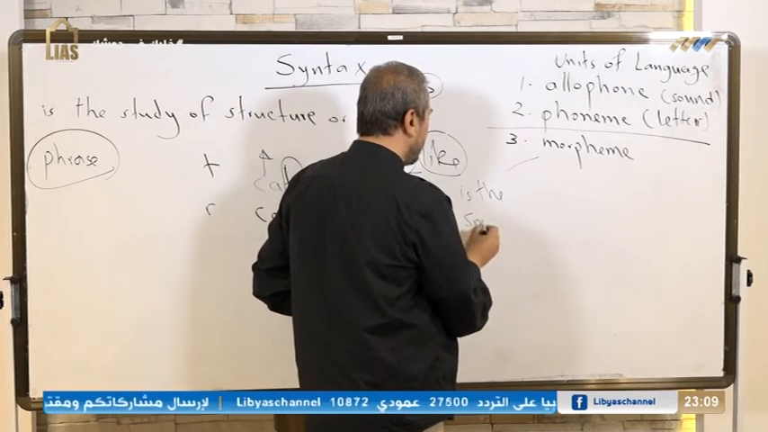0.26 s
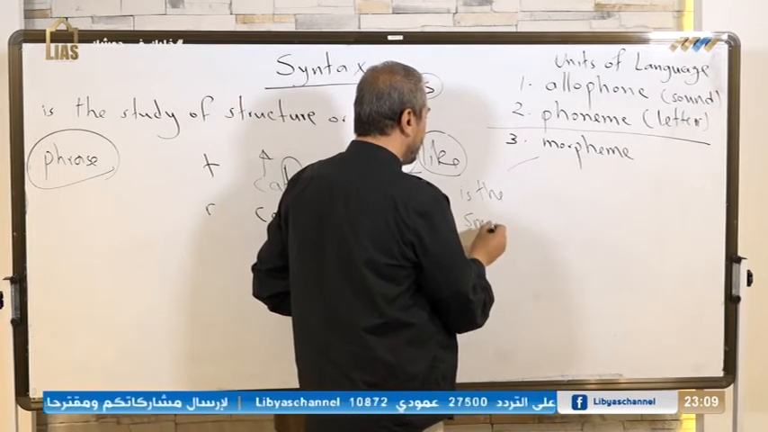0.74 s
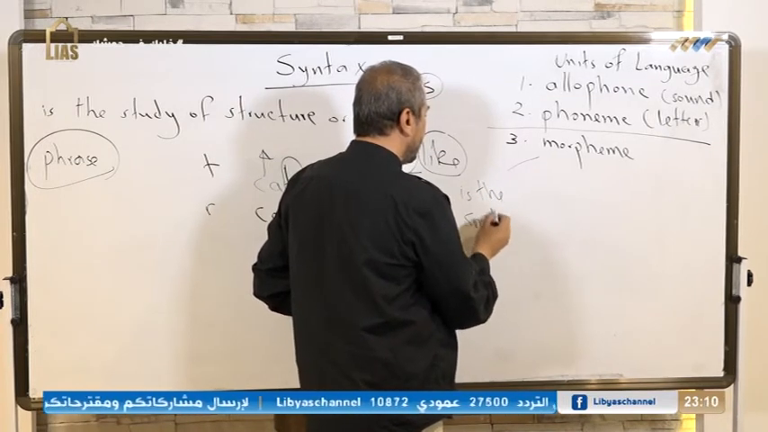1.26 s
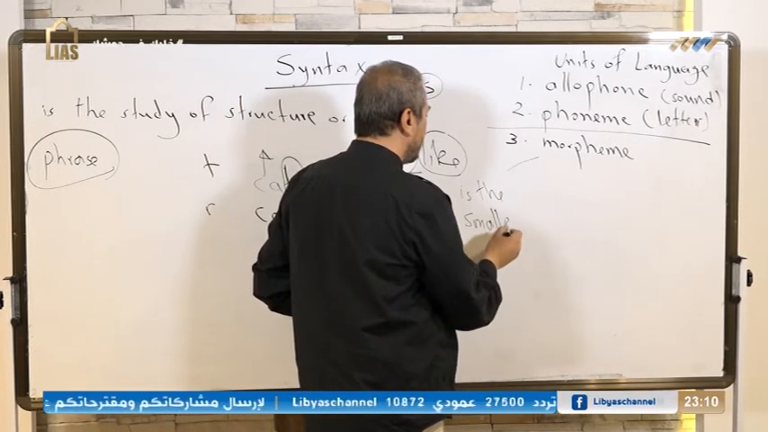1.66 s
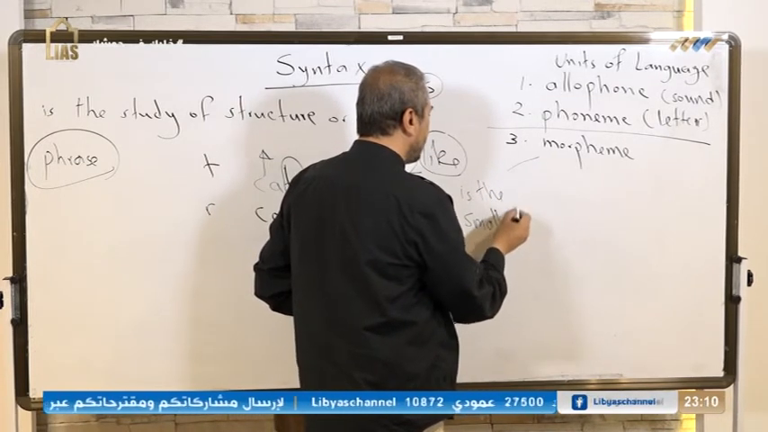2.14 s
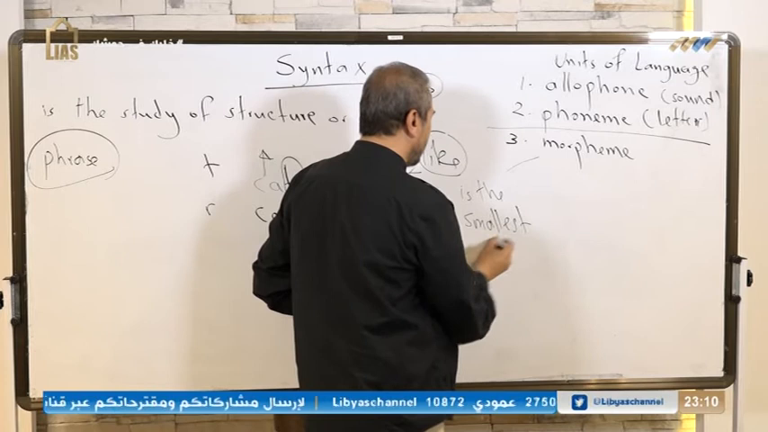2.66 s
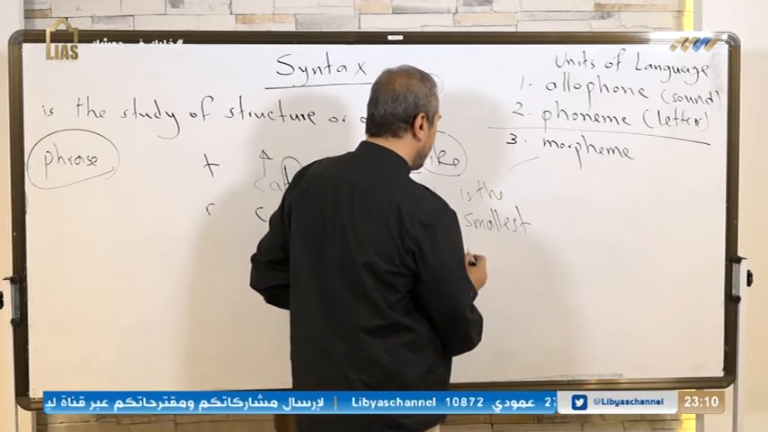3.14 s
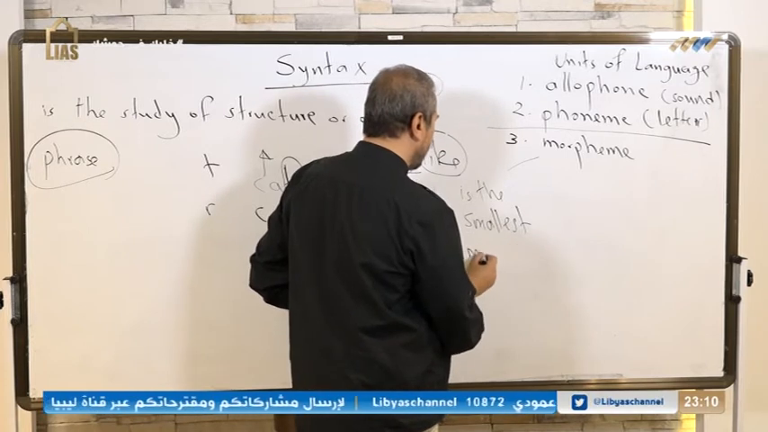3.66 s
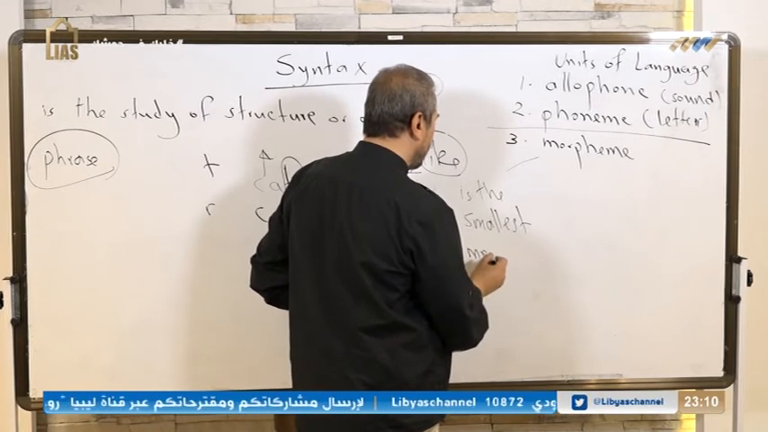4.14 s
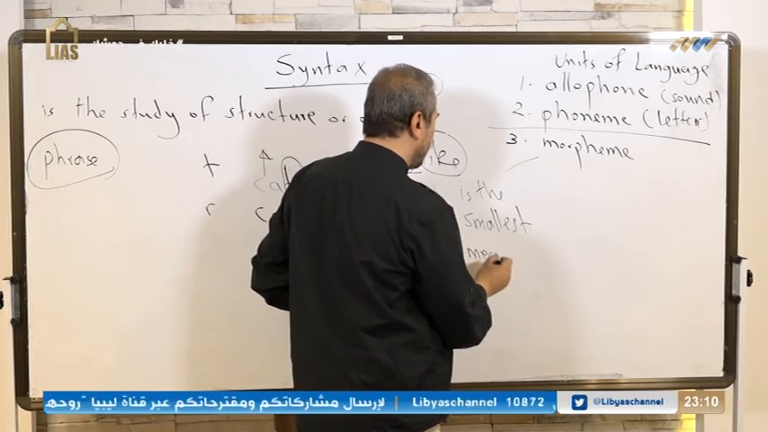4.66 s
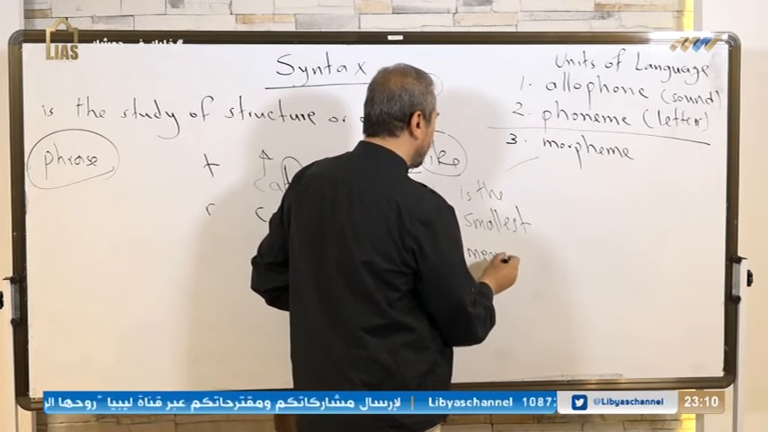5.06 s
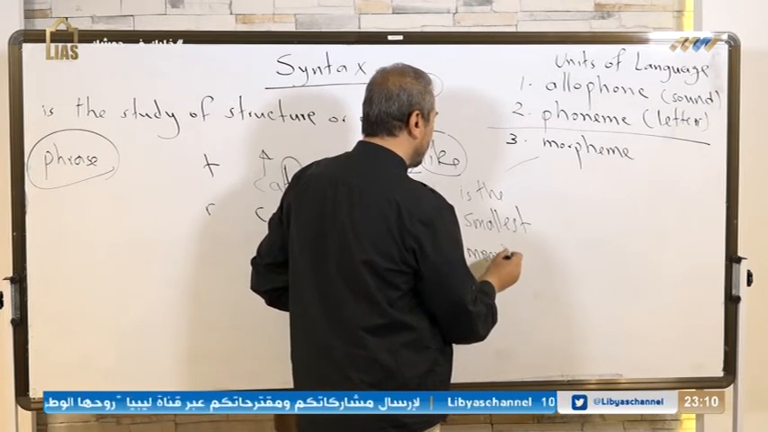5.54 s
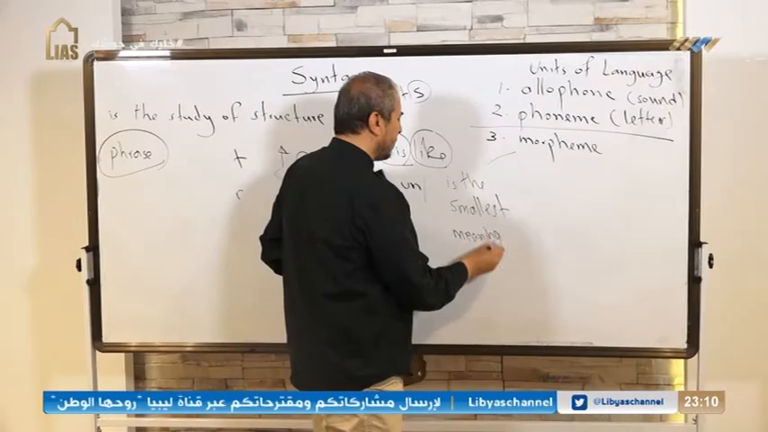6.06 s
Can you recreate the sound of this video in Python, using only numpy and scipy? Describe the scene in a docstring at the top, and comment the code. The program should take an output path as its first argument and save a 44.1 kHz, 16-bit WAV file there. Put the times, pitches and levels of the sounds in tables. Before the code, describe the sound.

Close to a whiteboard in a quiet room, a marker tip knocks on the panel about fourteen times at an uneven pace. The dull, resonant thumps are the loudest sounds, joined by soft scratchy strokes of felt. After a short break, a second stretch of writing follows with more sharp clicks from the plastic barrel. Low room rumble and very faint steady tones lie underneath.

```python
"""In a quiet room, someone writes two words with a felt marker on a wall-hung whiteboard.
Each landing of the tip is an impact that thumps the panel, clicks the barrel and scuffs the felt;
a stronger impact is shorter and excites more of the high modes. Stick-slip friction makes the felt
hiss along every stroke, brighter when it moves fast, and small sharp ticks fall in between.
Under it lie room rumble, hiss, a soft low rustle and faint steady tones."""
import sys
import numpy as np
from scipy import signal
from scipy.fft import rfft, irfft
from scipy.io import wavfile
from scipy.ndimage import uniform_filter1d

SR = 44100
rng = np.random.default_rng(int(sys.argv[2]) if len(sys.argv) > 2 else 0)


def int16_out(signal):
    """Quantize to a 16-bit WAV file."""
    q = np.round(np.clip(np.atleast_2d(signal).T, -1, 1) * 32767)
    wavfile.write(sys.argv[1], SR, q.astype(np.int16))


N = 277945
TIME = np.arange(N) / SR
LEAD_S = 0.008  # a blow on the panel is computed from this long before its crest

# Landings of the tip. Each row: time in seconds, level in dB.
LANDINGS = [(0.4621, -19), (0.9799, -15), (1.2506, -25.5), (1.4787, -15), (1.8184, -16), (2.182, -15),
            (2.4206, -17.5), (2.989, -16), (3.7787, -22.5), (4.1782, -21), (4.624, -19.5), (5.0621, -17.5),
            (5.2683, -15), (5.7551, -23.5)]


def landings(neutral_db=-18, chatter_lag_s=0.00399, chatter_rise_s=0.0017, chatter_t60=0.083):
    """Impact: a harder landing has a shorter contact, a brighter ring and more chatter."""
    # Each word lands on a different part of the panel, so its brief chatter has its own pitch and level.
    # Each row: start in seconds, chatter frequency in Hz, chatter level in dB relative to a landing
    # of neutral hardness.
    places = [(0, 365.7, -9.5), (2.7, 504, -22.5)]
    out, t = np.zeros(N), np.arange(SR // 4) / SR
    for s, db in LANDINGS:
        hard_db = 0.55 * (db - neutral_db)  # spectral tilt per octave
        width_s = 0.00146 * np.exp(-0.024 * hard_db)
        contact_s = 0.00057 * np.exp(-0.11 * hard_db)
        add(out, s - LEAD_S, panel(db, hard_db, width_s, contact_s))
        _, chatter_hz, chatter_db = [place for place in places if place[0] <= s][-1]
        chatter = ring(t, [(chatter_hz, db + chatter_db + 0.6 * hard_db, chatter_t60)], 0, chatter_hz)
        add(out, s + chatter_lag_s, -chatter * (1 - np.exp(-t / chatter_rise_s)))
    return out


def panel(db, hard_db, width_s, contact_s, scatter_db=-41, scatter_t60=1.0):
    """Impulse response of a struck plate: a thump, its reflections, free modes and diffuse sound."""
    # Modes of the panel. Each row: frequency in Hz, level in dB, time to fall 60 dB in seconds.
    modes = [(22, -26, 0.45), (46.7, -52, 0.57), (83.06, -18.5, 0.47), (94.2, -29.5, 0.89),
             (128.7, -17, 0.27), (142.9, -21, 0.78), (164.06, -22, 0.79), (214.7, -24.5, 0.63),
             (237.7, -25, 0.76), (261.6, -39.5, 0.99), (278, -29, 0.56), (340, -26, 0.42),
             (365.7, -29.5, 0.74), (354.5, -51.5, 0.81), (416, -40.5, 0.44), (516, -28, 0.26),
             (570, -48, 0.6), (590, -17, 0.026), (649, -50.5, 1), (640, -55, 0.36), (803, -62.5, 0.26)]
    # Reflections from the frame and the walls. Each row: delay in seconds, signed share of the thump.
    echoes = [(0.0086, 0.27), (0.019, 0.16), (0.0334, 0.1), (0.043, 0.4), (0.0525, -0.24), (0.0553, 0.07),
              (0.0851, 0.152), (0.0968, 0.088)]
    t = np.arange(SR) / SR - LEAD_S
    thumps = thump(t, width_s) + sum(share * thump(t - delay, width_s) for delay, share in echoes)
    force = np.exp(-2 * (np.arange(-64, 65) / SR / contact_s) ** 2)  # a long contact dulls the ring
    ringing = signal.fftconvolve(ring(t, modes, hard_db, 200), force / force.sum(), "same")
    # Sound scattered by the room. Each row: frequency in Hz, level in dB.
    spectrum = [(60, -2), (150, -5.5), (370, -2), (650, -6), (1000, -16.5), (2000, -37.5), (6000, -65)]
    scatter = coloured_noise(SR, spectrum)
    tail = np.clip(t / 0.0033, 0, 1) * undb(-60 * np.abs(t) / scatter_t60)
    return undb(db) * (thumps - ringing + undb(scatter_db + hard_db) * scatter * tail)


def thump(t, width_s, onset_widths=2.71, rise_s=0.0012):
    """Elastic recoil: the panel gives and springs back, so the pressure dips, crests and dips again."""
    u = t / width_s
    touch = np.clip((t + onset_widths * width_s) / rise_s, 0, 1)
    return (1 - u * u) * np.exp(-u * u / 2) * np.sin(np.pi / 2 * touch) ** 2


def strokes(neutral_db=-62.5, grain_db=6.5, flutter_db=2.0, rub_db=-17, damping=0.82, gain_db=1.27):
    """Stick-slip friction: felt fibres catch and slip, hissing louder and brighter in a fast stroke."""
    # Strokes of the felt. Each row: middle in seconds, length in seconds, relative level in dB.
    marks = [(0.049, 0.089, -64.5), (0.19, 0.088, -71.5), (0.286, 0.057, -58.5), (0.57, .08, -61.5),
             (0.692, 0.047, -63.5), (0.764, 0.056, -62.5), (1.061, .11, -60), (1.335, 0.082, -62),
             (1.544, 0.14, -67), (1.661, 0.085, -63.5), (1.94, .1, -64), (2.272, .12, -62.5),
             (2.455, 0.11, -72), (3.047, 0.098, -66.5), (3.166, .097, -68), (3.272, 0.1, -62.5),
             (3.403, 0.095, -66), (3.522, 0.077, -61.5), (3.9, 0.08, -68.5), (4.013, 0.093, -63.5),
             (4.282, 0.076, -61.5), (4.396, 0.083, -66.5), (4.481, 0.033, -67.5), (4.691, 0.062, -62),
             (4.801, .068, -68), (4.898, 0.067, -64.5), (5.105, .052, -63.5), (5.4, 0.059, -63.5),
             (5.507, 0.092, -66), (5.599, 0.08, -66), (5.768, 0.027, -64), (5.865, 0.068, -62),
             (5.967, 0.088, -66), (6.086, 0.14, -65.5)]
    # Resonances of the nib. Each row: nominal centre in Hz, nominal width in Hz, relative level in dB.
    nib = [(2950, 1620, -3), (6300, 3250, 0), (9060, 1370, -0.5)]
    # The nib's slant colours the hiss: its pitch drops at the new line and recovers along it.
    # Each row: time in seconds, pitch ratio, tilt in dB per octave.
    slant = [(0.7, 0.98, -2.5), (1.1, 0.99, 0), (2.5, 0.994, 1.5), (3.0, 0.86, -0.5), (4.4, 0.9, 1),
             (5.6, 0.96, 2)]
    slant_s, slant_ratio, slant_tilt = np.transpose(slant)
    out, t = np.zeros(N), np.arange(-8192, 8192) / SR
    drawn = [(s, length, db, 0.76 * (db - neutral_db)) for s, length, db in marks]
    scuffs = [(s + 0.018, 0.043, -70, -4.5) for s, _ in LANDINGS]  # short and dull, as the felt settles
    for s, length, db, tilt_db in drawn + scuffs:
        ratio = np.interp(s, slant_s, slant_ratio)
        tilt_db += np.interp(s, slant_s, slant_tilt)
        grain = undb(grain_db * rng.standard_normal(len(t)))
        hiss = undb(rub_db) * resonate(grain * rng.standard_normal(len(t)), hz=1800, width=7900)
        for hz, width, mode_db in nib:
            slips = grain * rng.standard_normal(len(t))
            gain = undb(mode_db + tilt_db * np.log2(hz / 6000))
            hiss += gain * resonate(slips, hz * ratio, width * damping)
        add(out, s + t[0], undb(db + gain_db) * unit(hiss) * swell(t, length))
    return out * undb(flutter_db * walk(110))


def ticks(click_early_s=0.0036):
    """Impulsive excitation: sharp contacts ring the barrel and jolt the panel; landings click faintly."""
    # Sharp contacts. Each row: time in seconds, level in dB, tilt in dB per octave, pitch ratio,
    # jolt of the panel in dB relative to the tick.
    contacts = [(0.134, -46, -14, 1.25, -3.5), (1.1128, -43, -11, 1.07, -15), (1.4271, -45, -9, 0.68, -3),
                (3.1152, -40.5, -24, 0.94, -8), (3.2178, -32, -8, 1.07, -5), (3.4694, -45, -27, 1.5, 5.5),
                (4.034, -47.5, -28, 1.24, -25), (4.3481, -34.5, -16, 1.45, -25),
                (4.3485, -36.5, -3, 1.08, -3), (4.4618, -30, 9, 1.05, -8.5), (4.855, -39, -10.5, 1.03, 2.5),
                (5.2796, -39, -28, 1.08, -13)]
    out = np.zeros(N)
    for s, db, tilt_db, ratio, jolt_db in contacts:
        add(out, s, barrel(db, tilt_db, ratio))
        jolt = panel(db + jolt_db, hard_db=5, width_s=0.0014, contact_s=0.00017)
        add(out, s - LEAD_S + 0.0018, jolt)
    for s, _ in LANDINGS:
        add(out, s - click_early_s, barrel(db=-52, tilt_db=-26, ratio=0.98))
    return out


def barrel(db, tilt_db, ratio, crack_db=-9, crack_t60=0.007, room_db=-30, room_t60=0.34):
    """Damped vibration of a struck plastic tube, with a crack of contact and a trace of reverberation."""
    # Modes of the barrel at pitch ratio 1. Each row: frequency in Hz, relative level in dB,
    # time to fall 60 dB in seconds.
    modes = [(2000, 6.5, 0.019), (2390, 0, 0.013), (2680, 8, 0.0062), (3100, -13, 0.0074),
             (3360, -3, 0.009), (4900, -12, 0.0024), (5650, 24, 0.0015), (8000, 0.5, 0.015),
             (8900, -34, .005)]
    # Spectrum of the crack at pitch ratio 1. Each row: frequency in Hz, relative level in dB.
    spectrum = [(300, 10), (1500, 1), (2000, 11.5), (2900, -16), (4000, -20.5), (9500, -18.5),
                (12000, -25.5)]
    t = np.arange(SR // 4) / SR
    tilted = [(hz * ratio, band_db + tilt_db * max(np.log2(hz / 2000), 0)) for hz, band_db in spectrum]
    crack = coloured_noise(len(t), tilted)
    fade = undb(crack_db - 60 * t / crack_t60) + undb(room_db - 60 * t / room_t60)
    # so thin a barrel radiates little below its first mode
    radiation = signal.butter(3, 1600 * ratio, "high", fs=SR, output="sos")
    body = signal.sosfilt(radiation, ring(t * ratio, modes, tilt_db, 2900))
    return undb(db) * (body / np.abs(body).max() + crack * fade)


def rustle(roughness_hz=170, wander=0.08, gain_db=-4):
    """Narrow-band noise: random modulation spreads a wandering pitch into a soft low rustle."""
    # Rustles. Each row: middle in seconds, length in seconds, centre in Hz, relative level in dB.
    swells = [(0.19, 0.32, 395, -56), (5.848, 0.17, 275.3, -46), (6.053, 0.18, 255, -47.5),
              (6.267, 0.12, 258, -47)]
    out = np.zeros(N)
    for s, length, hz, db in swells:
        phase = 2 * np.pi * np.cumsum(hz * (1 + wander * walk(24))) / SR
        band = walk(roughness_hz) * np.sin(phase) + walk(roughness_hz) * np.cos(phase)
        out += undb(db + gain_db) * swell(TIME - s, length) * band
    return out


def room(air_db=-55, whine_hz=1000, whine_rest_db=-88.5, rise_s=0.1, fade_db_per_s=16.5):
    """Noise floor: broadband rumble and hiss under spectral lines of mains hum, faint tones and whine."""
    # Rumble and hiss. Each row: frequency in Hz, relative spectral density in dB.
    spectrum = [(20, -4.5), (50, 1.5), (70, 1.5), (110, -5.5), (170, -6), (300, -14), (450, -18),
                (800, -21), (1500, -26.5), (3000, -29.5), (6000, -31), (9800, -31.5)]
    # Hum and steady tones. Each row: frequency in Hz, rms level in dB.
    lines = [(49, -67.5), (948, -81), (1047, -92), (1447, -92.5)]
    # The thin whine flares up and dies away. Each row: time of the crest in seconds, level in dB.
    crests = [(4.2, -74), (5.8, -70)]
    air = undb(air_db + 0.5 * walk(7.7)) * coloured_noise(N, spectrum)
    tones = sum(undb(db) * np.sin(2 * np.pi * hz * TIME + 1.2 * walk(4)) for hz, db in lines)
    flares = np.zeros(N)
    for s, db in crests:
        rise = np.exp(np.minimum(TIME - s, 0) / rise_s)
        flares += rise * undb(db - fade_db_per_s * np.maximum(TIME - s, 0))
    envelope = np.maximum(flares, undb(whine_rest_db)) * undb(3.2 * walk(16))
    whine = envelope * np.sin(2 * np.pi * whine_hz * TIME + 0.24 * walk(39))
    return air + np.sqrt(2) * (tones + whine)


def ring(t, modes, tilt_db, above_hz):
    """Free vibration: modes decay from t = 0, tilted by tilt_db per octave above above_hz."""
    t = np.maximum(t, 0)
    out = np.zeros(len(t))
    for hz, db, t60 in modes:
        start_db = db + tilt_db * max(np.log2(hz / above_hz), 0)
        out += undb(start_db - 60 * t / t60) * np.sin(2 * np.pi * hz * t)
    return out


def resonate(x, hz, width):
    """Forced vibration: two like resonators in series, with gain 1 at their centre."""
    f = np.maximum(np.fft.rfftfreq(len(x), 1 / SR), 1)
    return irfft(rfft(x) / (1 + 1j * (f * f - hz * hz) / (f * width)) ** 2, len(x))


def coloured_noise(n, points):
    """Spectral shaping: n samples of noise at rms 1 that follow (Hz, dB) points."""
    hz, db = np.transpose(points)
    f = np.maximum(np.fft.rfftfreq(n, 1 / SR), 1)
    gain = undb(np.interp(np.log(f), np.log(hz), db))
    return unit(irfft(rfft(rng.standard_normal(n)) * gain, n))


def walk(rate):
    """Random modulation: rate values a second, smoothed and scaled to rms 1."""
    k = max(int(SR / rate), 1)
    held = np.repeat(rng.standard_normal(N // k + 1), k)
    return unit(uniform_filter1d(uniform_filter1d(held, k), k)[:N])


def swell(t, length):
    """Amplitude envelope: a smooth rise, hold and fall around t = 0."""
    return np.exp(-np.abs(t / (0.5 * length)) ** 3)


def add(out, s, sound):
    """Superposition: mix a sound in from time s on."""
    at = int(round(s * SR))
    sound, at = sound[max(-at, 0):], max(at, 0)
    out[at:at + len(sound)] += sound[:max(len(out) - at, 0)]


def undb(db):
    """Decibels to amplitude ratio."""
    return 10 ** (np.asarray(db) / 20)


def unit(x):
    """Normalisation to rms 1."""
    return x / np.sqrt(np.mean(x ** 2))


def scene():
    """Superposition: all sources sum at one point close to the writer."""
    return (landings() + ticks() + strokes() + rustle() + room())[None]


def record(dry, top_hz=9800):
    """Band limiting: a steep low-pass filter cuts the top of the treble."""
    return signal.sosfilt(signal.ellip(12, .2, 70, top_hz, fs=SR, output="sos"), dry)


dry = scene()
out = record(dry)
int16_out(out)
```